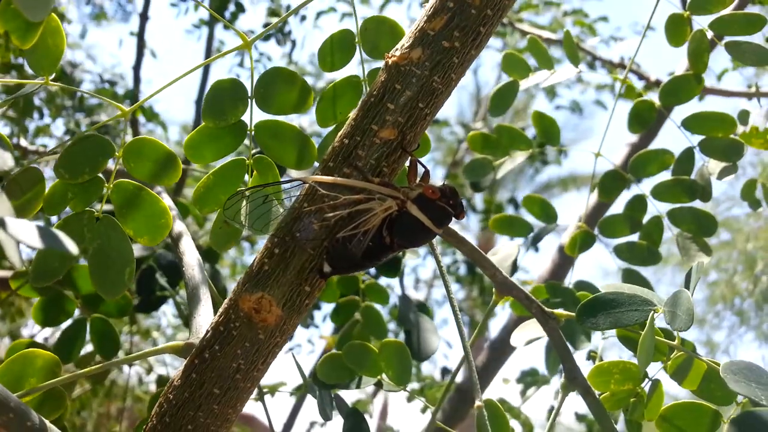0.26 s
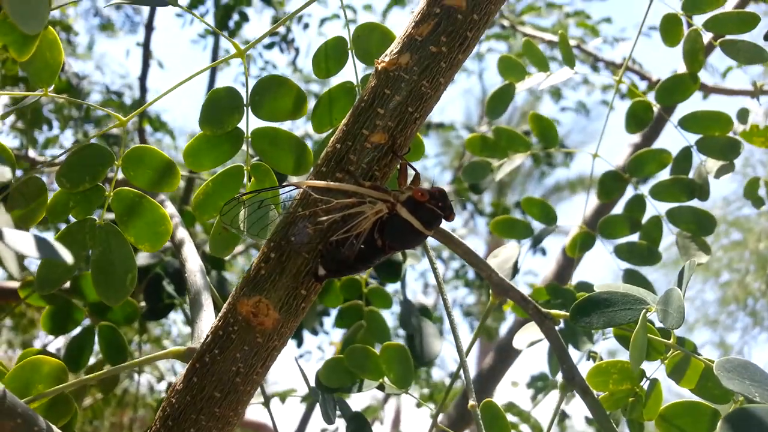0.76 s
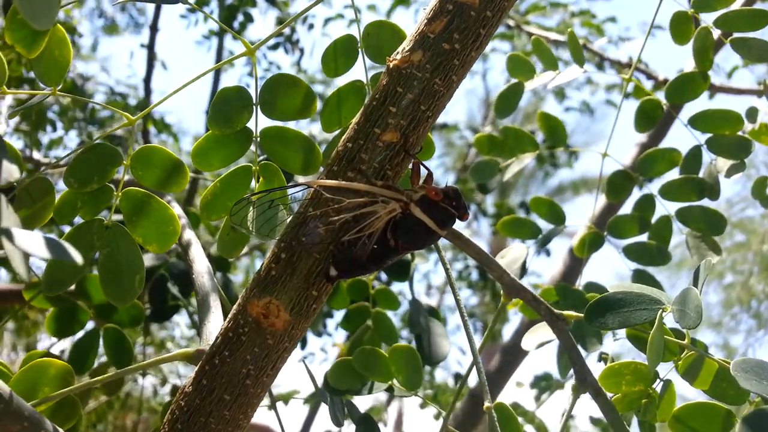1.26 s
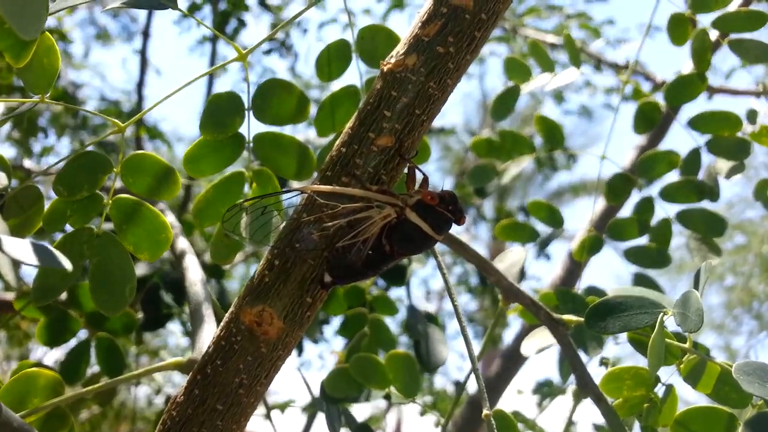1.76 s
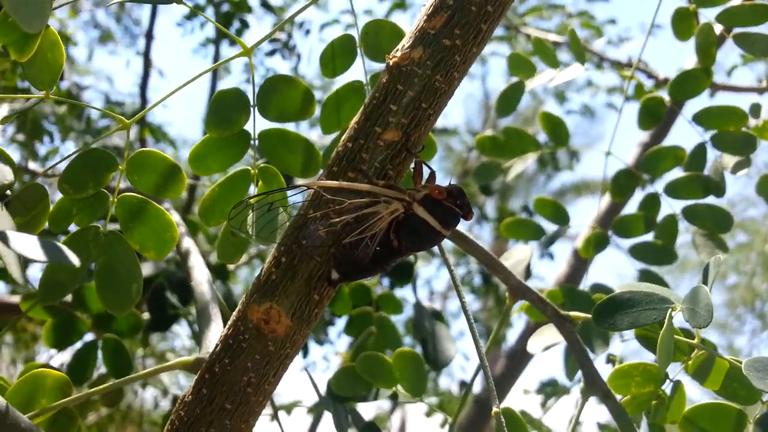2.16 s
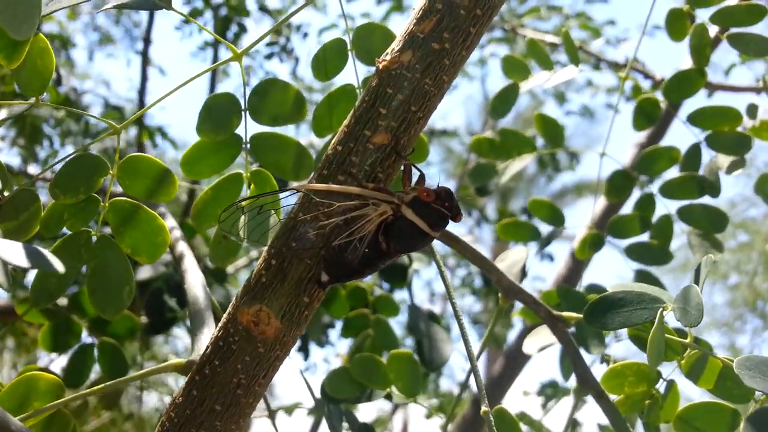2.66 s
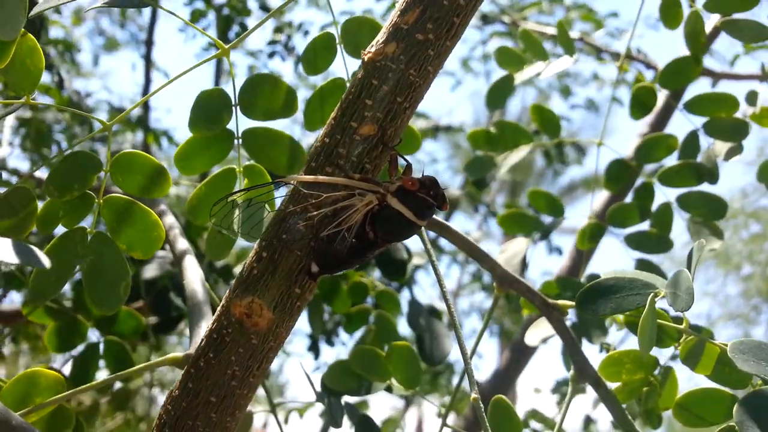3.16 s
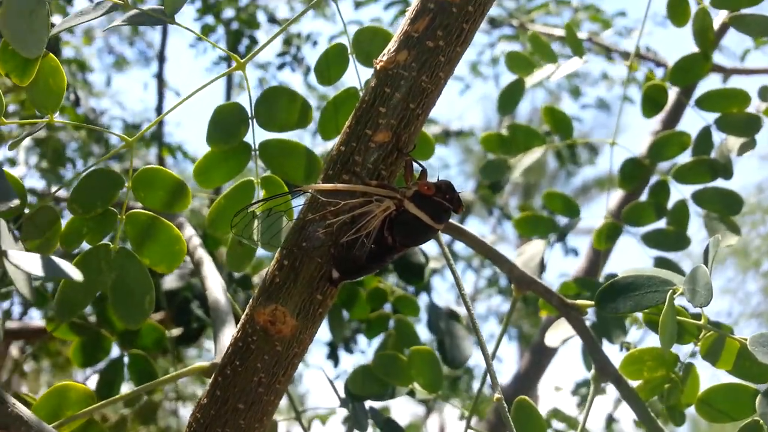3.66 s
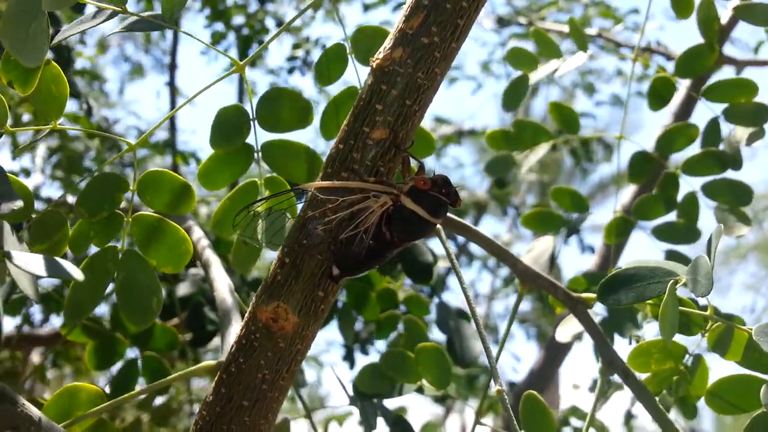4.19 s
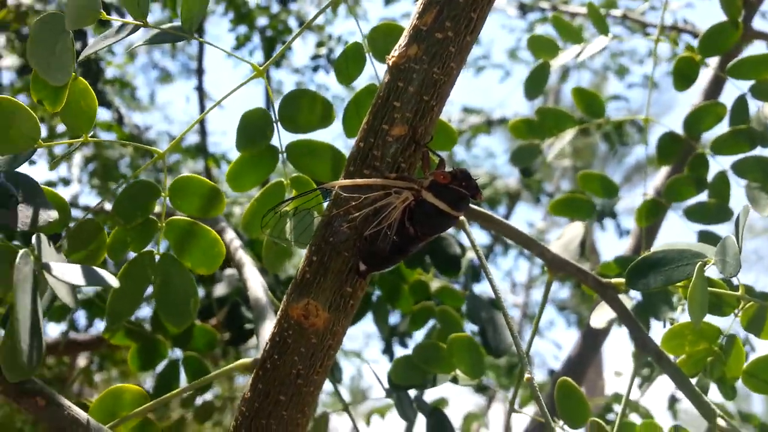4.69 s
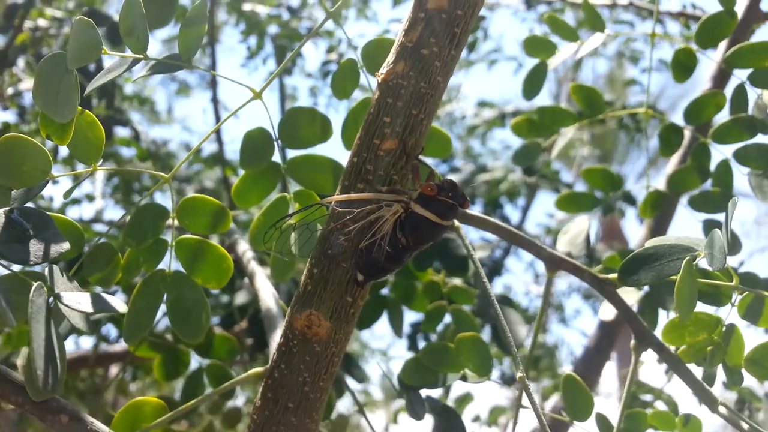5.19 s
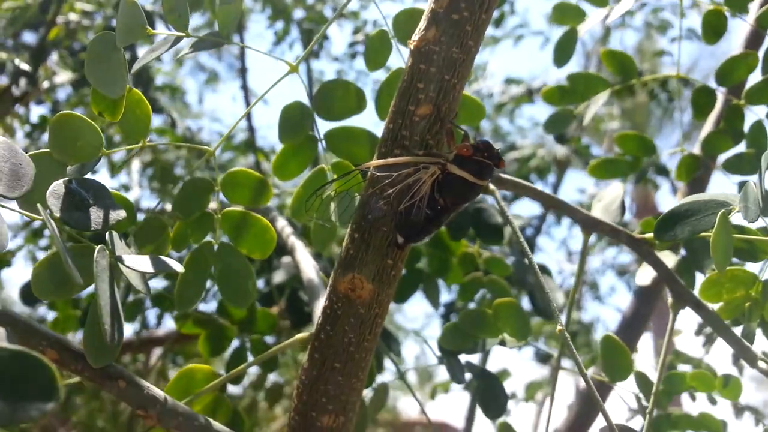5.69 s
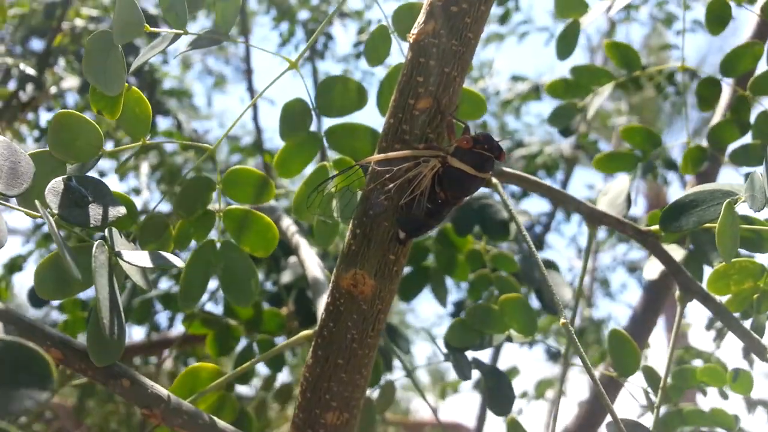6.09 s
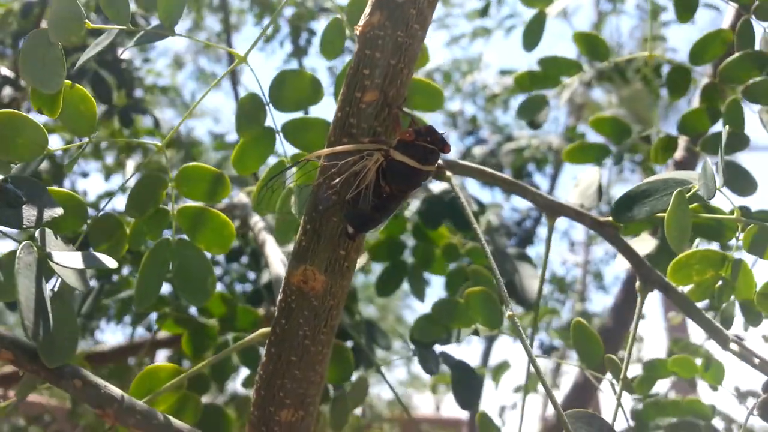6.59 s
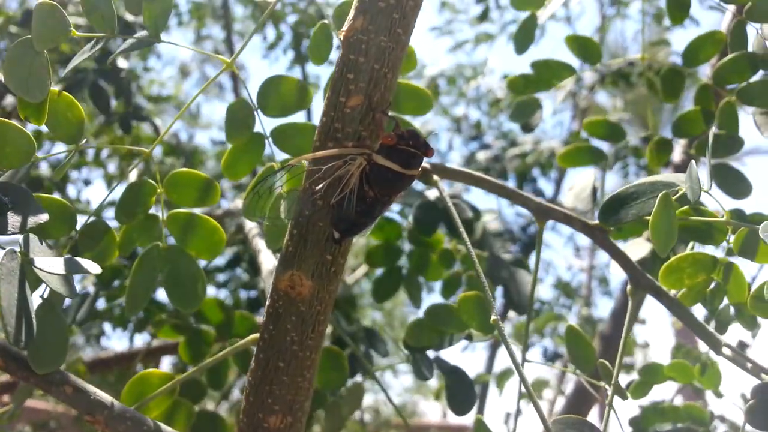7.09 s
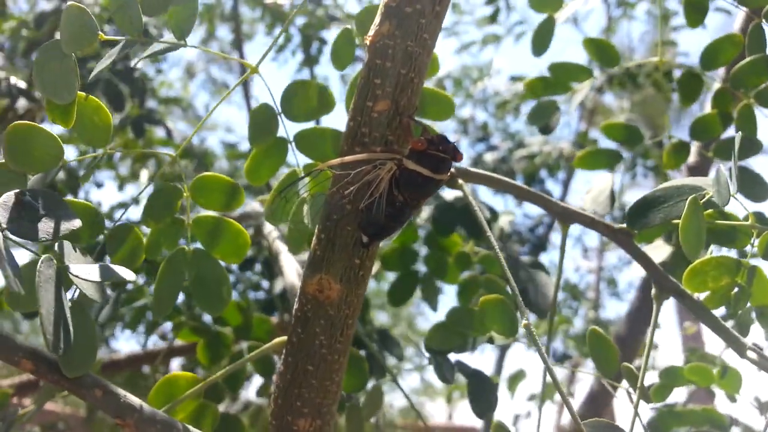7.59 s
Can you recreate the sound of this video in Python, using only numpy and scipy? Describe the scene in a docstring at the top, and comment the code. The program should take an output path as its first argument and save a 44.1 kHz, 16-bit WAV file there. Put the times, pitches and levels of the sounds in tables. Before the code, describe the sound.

A single cicada on a branch sings very close, a loud, piercing, unbroken buzz already going at the start and never pausing. Rapid even pulses fuse into a raspy, sizzling high tone with a fainter low buzz below. Its colour shifts as the handheld phone swings round, notably after the middle. Leaves blur it slightly; soft outdoor air is almost buried. Stereo, leaning right, slightly flattened, with the very top treble missing.

```python
"""A piercing, unbroken buzz near 9.4 kHz: a cicada sings on a branch close to a two-port phone.
About 158 times a second its tymbal snaps in and excites a damped ring and dry rib clicks.
A low buzz of pulses on the beat lies beneath, and bands of the song shift as the phone swings round.
Foliage scatters the song as short noise tails, and shaped noise makes a soft wash of outdoor air.
The microphone channel flattens high peaks and removes the top of the treble."""
import sys
import numpy as np
from scipy import signal
from scipy.fft import rfft, irfft, next_fast_len
from scipy.io import wavfile
from scipy.ndimage import map_coordinates

SR = 44100
rng = np.random.default_rng(int(sys.argv[2]) if len(sys.argv) > 2 else 0)


def waveform_to_disk(signal):
    """Save audio, clipped to [-1, 1], as 16-bit WAV at the path in sys.argv[1]."""
    frames = np.transpose(np.atleast_2d(signal))
    scaled = np.clip(frames, -1, 1) * 32767
    samples = np.round(scaled).astype(np.int16)
    wavfile.write(sys.argv[1], SR, samples)


N = 346185
TIME = np.arange(N) / SR  # s


# rib clicks around each snap, before drift and hurry: delay_ms, relative_level_db, timing_scatter_ms
RIB_CLICKS = [(0.03, -11, 0.017), (0.852, -2.5, 0.04), (1.29, 2, 0.027), (1.669, 3.5, 0.0405),
              (2.001, -6, 0.1085)]
# extra travel of the song to the left port: start_s, lag_ms
LEFT_LAG = [(0, 0.15), (3.3, 0.15), (3.7, 0.1446), (4.35, 0.14), (4.9, 0.13), (5.3, 0.13), (5.7, 0.11),
            (6.1, 0.1105), (6.75, 0.14), (7.35, 0.13), (7.8, 0.12)]
# bounce off the branch, rows left and right: delay_ms (the lag is added), level_db
BRANCH_BOUNCE = [(0.73, -11), (0.653, -11)]
# low ticks at the left and right port: level_db
GRIT_LEVEL_DB = (-11.5, -12.5)
RIB_HURRY_MS, RIB_RECOVER_S = 0.1155, 1.98  # after the stumble ribs buckle sooner, then ease back
PORT_SCATTER_MS, PULSE_SCATTER_MS = 0.0066, 0.0089
BUZZ_FALL_DB, BUZZ_WAVER_DB, BUZZ_SCATTER_DB = 2, 1.67, 2.5  # fall is per unit of swing


def cicada(ring_db, rib_db, buzz_db, snap_scatter_db, rib_scatter_db, pitch_scatter):
    """Impulsive excitation: each tymbal snap times a ring, rib clicks and a low pulse at two ports."""
    times = snap_times(jitter_ms=.037, memory=.9)
    lag_ms, = curves(LEFT_LAG, times)
    delay_ms, level, scatter_ms = np.transpose(RIB_CLICKS)
    chance = np.clip(rng.standard_normal((len(times), 3, len(RIB_CLICKS))), -1.8, 1.8)
    snap_sizes = amp(ring_db + snap_scatter_db * chance[:, 0, 0])
    detune = 1 + pitch_scatter * chance[:, 0, 1]

    stumble_s = STUMBLE_EVENT[0]
    hurry_ms = RIB_HURRY_MS * (times > stumble_s) * bell(times, stumble_s, RIB_RECOVER_S, order=1)
    slip_ms = scatter_ms * rib_slips(times, chance[:, 1])
    rib_delays_s = (delay_ms - hurry_ms[:, None] + slip_ms) / 1000
    rib_sizes = amp(rib_db + level + rib_scatter_db * chance[:, 2])

    arrivals = [times + lag_ms / 1000, times]
    ports = []
    for port, (at, (bounce_ms, bounce_db)) in enumerate(zip(arrivals, BRANCH_BOUNCE)):
        tone = ring(at, snap_sizes, port, detune, rise_ms=0.15, steepness=4.6)
        rib_times = at[:, None] + rib_delays_s
        # each click reaches each port a little early or late
        stray_s = PORT_SCATTER_MS * rng.standard_normal(rib_times.shape) / 1000
        ribs = rib_clicks(rib_times + stray_s, rib_sizes, port, bounce_ms + lag_ms, bounce_db)
        ports.append(tone + ribs + amp(GRIT_LEVEL_DB[port]) * grit(rib_times))

    pulse_level = BUZZ_WAVER_DB * wobble(times, rate=11) + BUZZ_SCATTER_DB * chance[:, 0, 2]
    pulse_level = pulse_level - BUZZ_FALL_DB * position(times)
    # the low pulse comes just ahead of the ring, which needs a few cycles to build up
    pulse_times = times - .0003 + PULSE_SCATTER_MS * rng.standard_normal(len(times)) / 1000
    buzz = low_buzz(pulse_times, amp(pulse_level), second_ms=1.623, second_db=-16, smear_ms_per_khz=0.4455)
    return np.array(ports) + amp(buzz_db)[:, None] * buzz


SNAP_HZ = 158.3
# the one stumble of the beat: centre_s, half_length_s, rate_loss_hz
STUMBLE_EVENT = (3.35, .06, 2.3)


def snap_times(jitter_ms, memory):
    """Quasi-periodic excitation: a steady muscle beat whose timing errors fade over the next snaps."""
    when, length, lost_hz = STUMBLE_EVENT
    cycles = np.cumsum(SNAP_HZ - lost_hz * bell(TIME, when, length)) / SR
    beats = np.interp(np.arange(int(cycles[-1]) + 1), cycles, TIME)
    slips = rng.standard_normal(len(beats))
    return beats + signal.lfilter([jitter_ms / 1000], [1, -memory], slips)


# song at the left port: start_s, pitch_at_crest_hz, ring_length_ms, sizzle_gain_db
LEFT_SONG = [(0, 9150, 0.83, -2), (2.8, 9160, 0.9, 2), (3.4, 9350, 0.71, 6), (4.3, 9370, 0.96, 5),
             (4.9, 9490, 0.74, 5), (5.6, 9690, 1, -2), (6.3, 9800, 0.82, 1), (6.65, 10040, 0.61, -12),
             (7.2, 9830, 0.55, -1), (7.55, 9740, 0.59, -1), (7.85, 9800, 0.88, -4)]
# song at the right port: start_s, pitch_at_crest_hz, ring_length_ms, sizzle_gain_db
RIGHT_SONG = [(0, 9440, 0.86, 3.5), (2.7, 9246, 1, 2), (3.2, 9370, 0.75, -2.5), (3.6, 9280, 0.9, 1),
              (4.5, 9350, 0.53, 3.5), (4.9, 9000, 0.51, 0), (5.5, 9400, 0.46, 0), (6.25, 9500, 0.41, 1.5),
              (6.6, 9120, 0.76, 1), (7.85, 9230, 0.65, 2)]
# pitch slide within each ring, left and right: glide_hz_per_ms
RING_GLIDE = (-150, 647)
AFTER_DB, AFTER_MS = (-14.5, -18), 1.61  # faint after-ring: left and right level, length


def ring(times, sizes, port, detune, rise_ms, steepness, crest_ms=.35):
    """Damped resonance: the abdomen rings briefly after each snap, then dies to a faint after-ring."""
    last = np.maximum(np.searchsorted(times, TIME) - 1, 0)
    age_ms = np.maximum(TIME - times[last], 0) * 1000
    pitch_hz, hold_ms, _ = curves((LEFT_SONG, RIGHT_SONG)[port], TIME)
    after_ring = amp(AFTER_DB[port]) * bell(age_ms, 0, AFTER_MS, order=6)
    decay = bell(age_ms, 0, hold_ms, steepness) + after_ring
    from_crest = age_ms - crest_ms  # the phase is set at the crest
    mean_pitch_hz = pitch_hz * detune[last] + RING_GLIDE[port] * from_crest / 2
    cycles = mean_pitch_hz * from_crest / 1000
    envelope = sizes[last] * (1 - np.exp(-age_ms / rise_ms)) * decay
    tone = envelope * np.sin(2 * np.pi * cycles)
    return filtered(tone, lambda hz: 1 - bell(hz, 0, 4700, order=8))  # the ring is kept above about 5 kHz


# colour of a rib click: frequency_hz, level_db
CLICK_COLOUR = [(4300, -35), (5300, -17.5), (6100, -7), (6750, 1.5), (7400, -0.9), (7850, 0.5), (8400, 0.5),
                (9400, 0), (10200, -5), (10750, 1.5), (11300, 1), (12200, -3), (13200, -9.5),
                (14300, -10.5)]
SIZZLE_HZ, SIZZLE_WIDTH_HZ = 12200, 870


def rib_clicks(times, sizes, port, bounce_ms, bounce_db):
    """Comb filtering: dry clicks and their bounce off the branch carve slowly moving bands."""
    bounce = impulses(times + bounce_ms[:, None] / 1000, sizes * amp(bounce_db))
    clicks = struck(impulses(times, sizes) + bounce, CLICK_COLOUR)
    _, _, sizzle_db = curves((LEFT_SONG, RIGHT_SONG)[port], TIME)
    sizzle = filtered(clicks, lambda hz: resonance(hz, SIZZLE_HZ, SIZZLE_WIDTH_HZ))
    return clicks + (amp(sizzle_db) - 1) * sizzle


DRIFT_SHARE, DRIFT_HZ = 0.748, 23.99  # share of the timing scatter that drifts over several snaps, and its rate


def rib_slips(times, chance):
    """Correlated jitter: each rib buckles early or late, partly by slow drift, partly anew each snap."""
    drift = np.transpose([wobble(times, DRIFT_HZ) for _ in RIB_CLICKS])
    return np.sqrt(DRIFT_SHARE) * drift + np.sqrt(1 - DRIFT_SHARE) * chance


# colour of the irregular low ticks: frequency_hz, level_db
GRIT_COLOUR = [(150, -24), (500, -6), (1000, 2.5), (1600, 2), (2500, -2), (3700, -16), (4400, -21),
               (5400, -2), (6500, -13)]


def grit(times):
    """Random impulse excitation: low ticks of random size and sign at the clicks roughen the buzz."""
    return struck(impulses(times, rng.standard_normal(times.shape)), GRIT_COLOUR)


# colour of the low buzz on the beat: frequency_hz, level_db
BUZZ_COLOUR = [(60, -45), (160, -5), (500, -12), (950, 1.5), (1400, 2), (1850, 2), (2500, -0.5),
               (3050, 0.5), (3700, -7.5), (4400, -20), (5300, -6), (6500, -10)]
# bands of the low buzz, two dull, one nasal, one raspy: frequency_hz, width_hz, relative_level_db
BUZZ_BANDS = [(320, 240, -8), (590, 540, -3), (1215, 220, 3.5), (3740, 1650, 2)]
# change in their level: start_s, dull_db, nasal_db, raspy_db
BUZZ_BAND_CHANGE = [(0, -3, -12, -12), (.5, 4, -20, -8), (3.2, 3.5, -12, -13), (3.7, 9.5, -7, -4),
                    (5.0, 7, -4, 2.5), (5.15, -4.5, -4, 1.5), (6.3, -8, -1, -2), (7.85, -11, -14, -9)]
BAND_WAVER_DB = 1.2  # each band wavers on its own


def low_buzz(times, sizes, second_ms, second_db, smear_ms_per_khz):
    """Source and filter: paired pulses on the beat, coloured in bands, buzz low beneath the song."""
    first = impulses(times, sizes)
    second = impulses(times + second_ms / 1000, sizes * amp(second_db))
    buzz = struck(first + second, BUZZ_COLOUR)
    dull, nasal, raspy = curves(BUZZ_BAND_CHANGE, TIME)
    for (centre, width, db), change in zip(BUZZ_BANDS, [dull, dull, nasal, raspy]):
        band = filtered(first, lambda hz: resonance(hz, centre, width))
        buzz = buzz + amp(db + change + BAND_WAVER_DB * wobble(TIME, rate=6)) * band
    # dispersion: the high tones of each pulse come later than its low ones
    return filtered(buzz, lambda hz: np.exp(-1j * np.pi * smear_ms_per_khz * (hz / 1000) ** 2))


# swing of the phone round the branch: start_s, position (0-1)
PHONE_SWING = [(0, 0.11), (2.9, 0.05), (3.5, 0.48), (4.5, 0.6), (5.25, 0.72), (6.75, 0.62), (7.85, 0.87)]


def position(at):
    """Kinematics: where the phone is along its swing, joined by straight lines."""
    return curves(PHONE_SWING, at)[0]


# bands that swell or sink: centre_s, half_length_s, frequency_hz, width_hz, left_db, right_db
SWING_BANDS = [(1.04, 2.7, 1730, 870, 2, 4.5), (2.9, 0.4, 400, 190, -1, 1.5),
               (1.4, 2.2, 5300, 150, 2.5, 3.5), (1.15, 1.7, 10600, 560, 2, 3),
               (1.6, 2.2, 11900, 770, -6, 1), (1.2, 1.7, 12600, 500, 2.5, -5),
               (2.2, 2.1, 8750, 410, 0, -4.5), (3.65, 0.38, 7200, 410, 3.5, 2.5),
               (3.6, 0.73, 6240, 480, -3.5, -1.5), (3.8, 0.91, 11700, 600, 1.5, 2.5),
               (4.2, 1, 12500, 600, -9, -1), (3.7, 0.6, 9150, 530, 3, 1), (4.44, 0.3, 8250, 300, 2, 2),
               (4.6, 0.55, 10000, 580, 4, 0.5), (5.86, 0.9, 9450, 480, 1.5, 2),
               (5.9, 0.45, 11300, 920, -3.5, -6), (5.75, 0.55, 12200, 450, 7, 2.5),
               (6.8, 1.1, 9000, 250, 4.5, -1.5), (7.1, 0.68, 1240, 440, 1.5, -3.5),
               (7, 0.6, 11500, 1600, 3.5, 1.5), (6.87, 0.58, 6600, 580, 3.5, 2),
               (7.2, 0.5, 11800, 500, 2, -1), (7.3, 0.5, 13600, 780, 5, 2)]


def shifting(song):
    """Directional filtering: bands come and go as the phone moves past the branch and its leaves."""
    shifted = song
    for when, length, centre, width, *port_db in SWING_BANDS:
        band = filtered(song, lambda hz: resonance(hz, centre, width))
        shifted = shifted + bell(TIME, when, length, order=6) * (amp(port_db)[:, None] - 1) * band
    return shifted


FOLIAGE_T60 = 0.25  # s


def foliage(x, wet_db, ring_cut_db, count=80):
    """Diffuse scattering: swaying leaves give ever new echo tails; the beamed ring scatters less."""
    t, hop = TIME[:SR // 4], N // count
    echo = np.zeros((2, N + SR))
    for start in range(0, N, hop):
        tail = rng.standard_normal((2, len(t))) * amp(-60 * t / FOLIAGE_T60) * (t > .002)
        part = signal.fftconvolve(x[:, start:start + hop], tail / np.linalg.norm(tail[0]), axes=1)
        echo[:, start:start + part.shape[1]] += part

    def scatter(hz):
        long_waves = 1 - 0.037 / (1 + (hz / 4500) ** 4)  # long waves scatter very slightly less
        return long_waves * amp(wet_db - ring_cut_db * np.exp(-((hz - 9550) / 1000) ** 2))

    return filtered(echo[:, :N], scatter)


# spectrum of outdoor air: frequency_hz, relative_density_db (per Hz)
AIR_COLOUR = [(25, -8.5), (100, -6.5), (220, -6.5), (400, -5), (1000, -4.5), (1800, -3.5), (2600, -0.5),
              (3300, -1), (4300, -0.5), (6000, -1), (14000, -62)]
# one low puff of air: centre_s, half_length_s, rise_db
AIR_PUFF = (3.29, 0.031, 6.5)
RUMBLE_DB, RUMBLE_RISE_DB, RUMBLE_WAVER_DB = -44.5, 6.5, 2.5  # base, rise per unit of swing, waver


def air(rustle_db, split_hz):
    """Broadband noise: a soft outdoor wash, unrelated at the two ports, with a wavering low part."""
    low = lambda hz: 1 / (1 + (hz / split_hz) ** 4)
    colour = lambda hz: amp(along(AIR_COLOUR, hz))
    rumble = filtered(rng.standard_normal((2, N)), lambda hz: colour(hz) * np.sqrt(low(hz)))
    rustle = filtered(rng.standard_normal((2, N)), lambda hz: colour(hz) * np.sqrt(1 - low(hz)))
    when, length, puff_db = AIR_PUFF
    level_db = RUMBLE_DB + RUMBLE_RISE_DB * position(TIME) + puff_db * bell(TIME, when, length)
    level_db = level_db + RUMBLE_WAVER_DB * wobble(TIME, rate=7)
    return amp(level_db) * unit(rumble) + amp(rustle_db) * unit(rustle)


# colour difference of the ports: frequency_hz, left_minus_right_db
PORT_COLOUR = [(100, 9), (1000, 4.5), (2200, 4.5), (3500, -3), (6500, 2), (8000, 3), (8800, 2), (9600, 1.5),
               (10250, 3), (10850, 11), (11600, 4.5), (12400, -2.5), (14000, 3)]


def port_colour(x):
    """Spectral difference between receivers: each port takes half of it, with opposite sign."""
    return filtered(x, lambda hz: amp(np.outer([.5, -.5], along(PORT_COLOUR, hz))))


def overload(x, top, hardness):
    """Saturation: the microphone channel flattens peaks towards a ceiling."""
    return x / (1 + np.abs(x / top) ** hardness) ** (1 / hardness)


# narrow bands, mostly made quieter: centre_s, half_length_s, frequency_hz, width_hz, left_db, right_db
QUIET_BANDS = [(1.3, 1.85, 4400, 460, -6, -7), (4.5, 1.2, 4220, 300, -11, 0.5),
               (5.2, 0.9, 2800, 600, -5.5, 0), (6.0, 0.32, 3900, 900, -4.5, 0),
               (7.3, 0.89, 3450, 1310, -10, 2.5)]


def dipped(x):
    """Time-varying filtering: narrow bands under the song are mostly quieter, by set amounts at set times."""
    for when, length, centre, width, *port_db in QUIET_BANDS:
        band = filtered(x, lambda hz: bell(hz, centre, width, order=4))
        x = x + bell(TIME, when, length, order=8) * (amp(port_db)[:, None] - 1) * band
    return x


def amp(db):
    """Logarithmic level: decibels to gain."""
    return 10 ** (np.asarray(db) / 20)


def unit(x):
    """Root-mean-square level: scale to rms 1."""
    return x / np.sqrt(np.mean(x ** 2) + 1e-20)


def along(points, hz):
    """Logarithmic frequency scale: (Hz, value) points read on a log axis."""
    f, v = np.transpose(points)
    return np.interp(np.log(hz + 1), np.log(f + 1), v)


def curves(rows, at):
    """Linear interpolation: each column of a table, read at the given times."""
    s, *cols = np.transpose(rows)
    return [np.interp(at, s, c) for c in cols]


def bell(x, centre, width, order=2):
    """Generalised Gaussian: 1 at the centre, fading beyond the width; higher orders have flatter tops."""
    return np.exp(-np.abs((x - centre) / width) ** order)


def wobble(at, rate):
    """Smooth random variation: a spline through random knots, rate knots a second."""
    return map_coordinates(rng.standard_normal(N // 100), [at * rate], mode="mirror")


def filtered(x, response):
    """Linear filtering: the spectrum of x times a response of frequency."""
    m = next_fast_len(N + SR // 4)
    return irfft(rfft(x, m) * response(np.fft.rfftfreq(m, 1 / SR)), m)[..., :N]


def resonance(hz, centre, width):
    """Damped oscillator: causal response that passes a band round its centre."""
    return 1j * hz * width / (centre ** 2 - hz ** 2 + 1j * hz * width)


def struck(x, spectrum, size=1024):
    """Minimum phase: x through the causal response that has this spectrum."""
    cepstrum = irfft(np.log(amp(along(spectrum, np.fft.rfftfreq(size, 1 / SR)))))
    fold = np.r_[1, np.full(size // 2 - 1, 2), 1, np.zeros(size // 2 - 1)]
    return signal.fftconvolve(x, irfft(np.exp(rfft(cepstrum * fold))))[:N]


def impulses(times, sizes, order=8):
    """Band-limited sampling: windowed sinc impulses placed between samples."""
    at = np.ravel(times)[:, None] * SR
    index = np.floor(at).astype(int) + np.arange(1 - order, order + 1)
    shape = np.sinc(index - at) * np.cos(np.pi * (index - at) / (2 * order)) ** 2
    inside = (index >= 0) & (index < N)
    return np.bincount(index[inside], (shape * np.ravel(sizes)[:, None])[inside], N)


LEFT_MINUS_RIGHT_DB = -6.5  # balance of the song between the ports


def scene():
    """Superposition: the singer, its scatter and the air add up at the two ports."""
    song = cicada(ring_db=5.5, rib_db=9.5, buzz_db=(-14, -2.8),  # low buzz at left and right port
                  snap_scatter_db=2.0, rib_scatter_db=1.15, pitch_scatter=0.0015)
    song = shifting(song) * amp(np.outer([.5, -.5], LEFT_MINUS_RIGHT_DB))
    scatter = foliage(song, wet_db=-8.0, ring_cut_db=10.0)
    return port_colour(song + scatter + air(rustle_db=-31, split_hz=530))


TOP_HZ = 14480  # band limit of the microphone channel


def record(dry):
    """Saturation and band limiting: peaks flatten, narrow bands change level, the top treble is cut."""
    fine = signal.resample_poly(dry, 2, 1, axis=1)  # oversampled to limit aliasing
    flat = signal.resample_poly(overload(fine, top=0.89, hardness=22), 1, 2, axis=1)
    return filtered(dipped(flat), lambda hz: 1 / np.sqrt(1 + (hz / TOP_HZ) ** 200))


dry = scene()
out = record(dry)
waveform_to_disk(out)
```